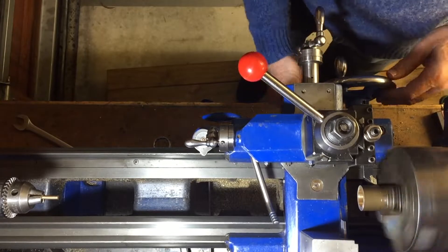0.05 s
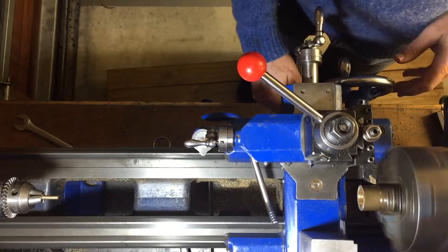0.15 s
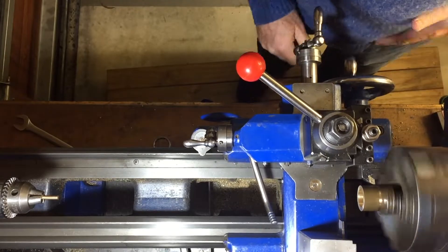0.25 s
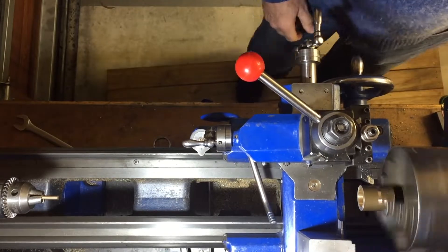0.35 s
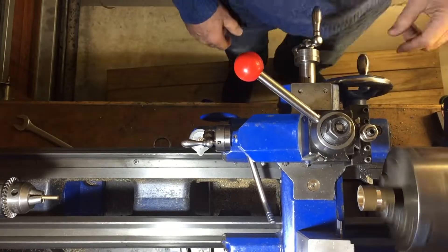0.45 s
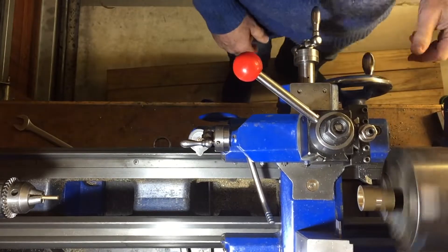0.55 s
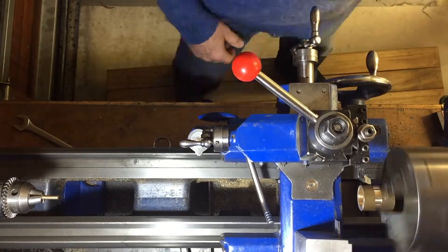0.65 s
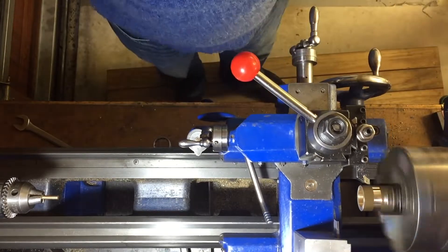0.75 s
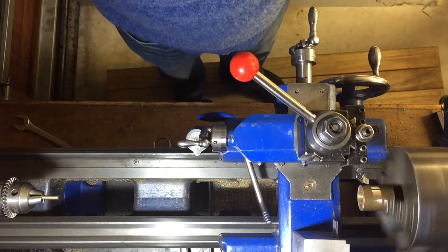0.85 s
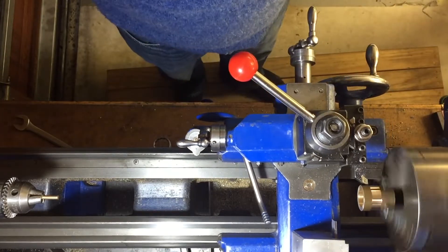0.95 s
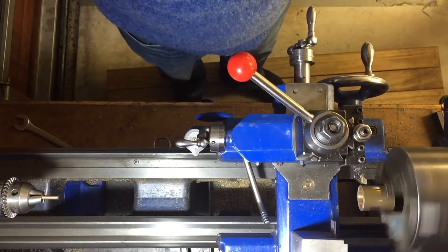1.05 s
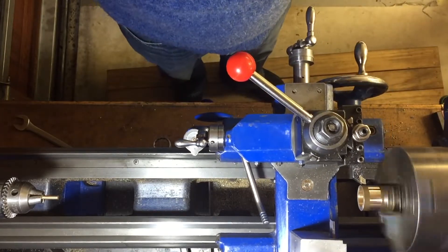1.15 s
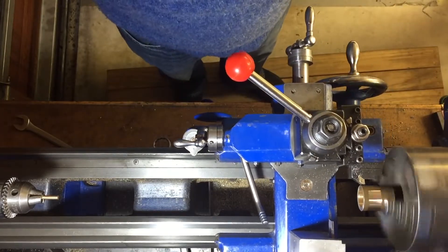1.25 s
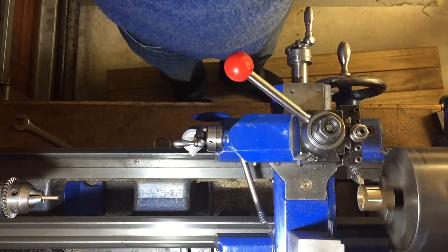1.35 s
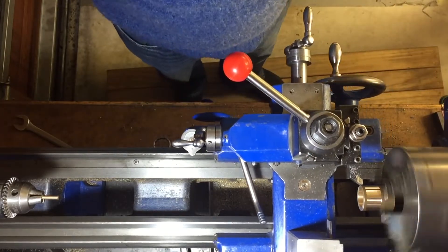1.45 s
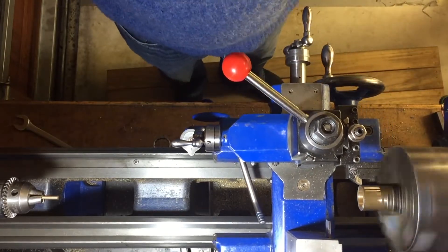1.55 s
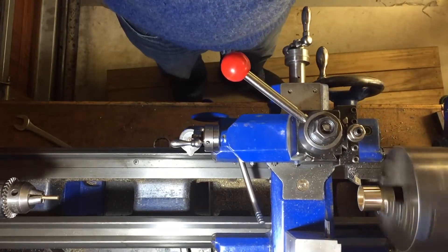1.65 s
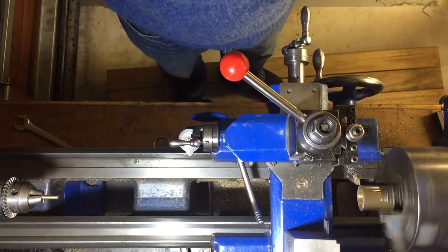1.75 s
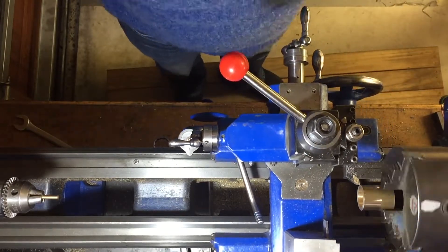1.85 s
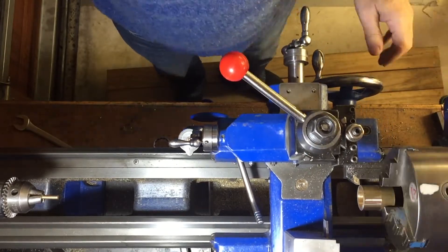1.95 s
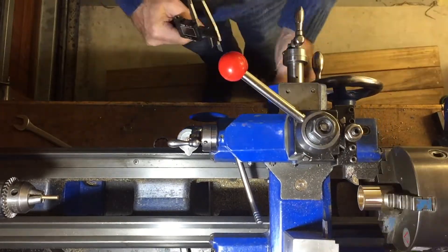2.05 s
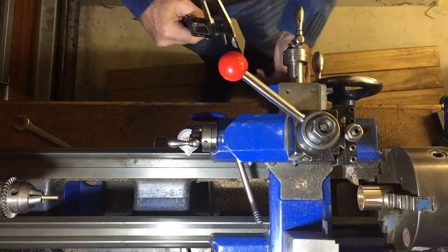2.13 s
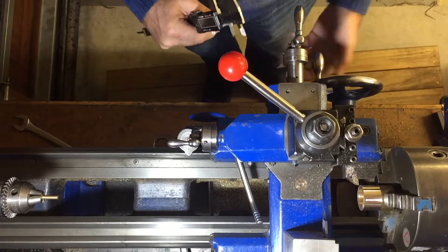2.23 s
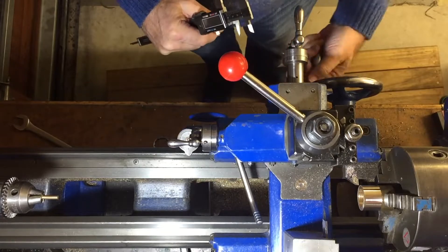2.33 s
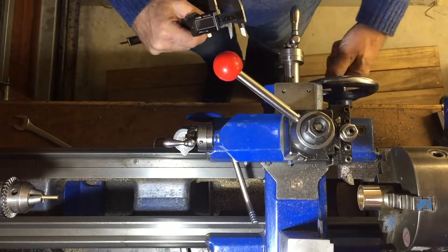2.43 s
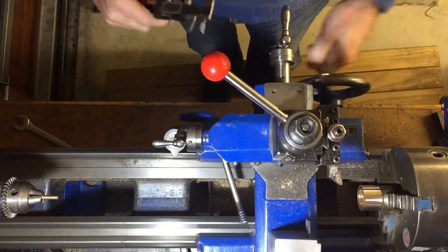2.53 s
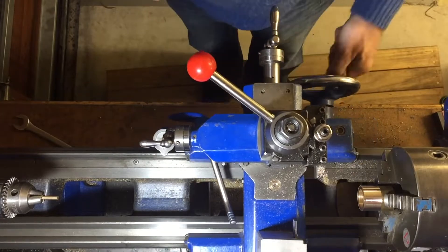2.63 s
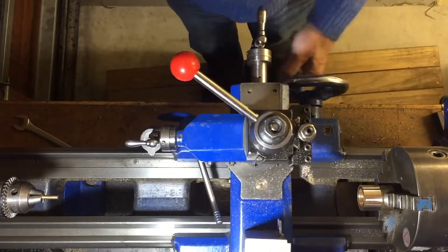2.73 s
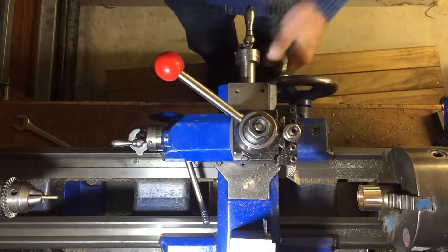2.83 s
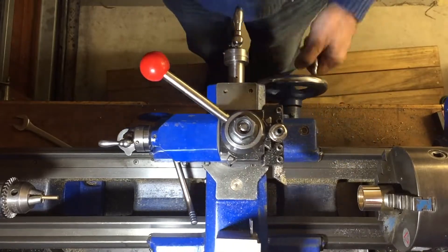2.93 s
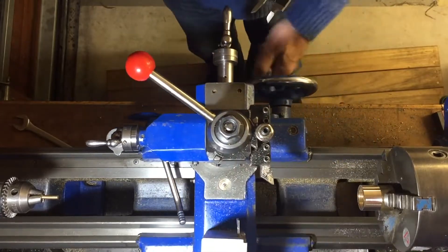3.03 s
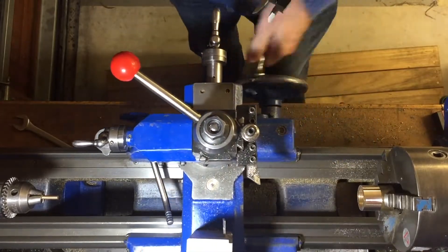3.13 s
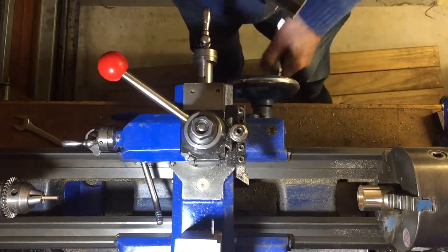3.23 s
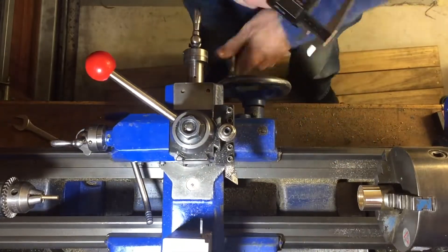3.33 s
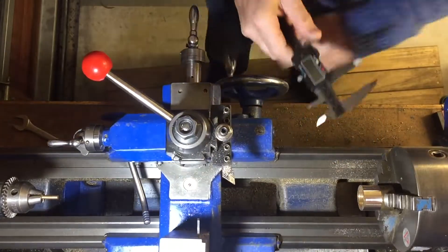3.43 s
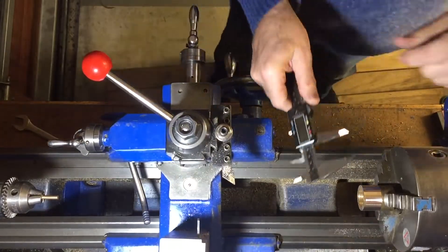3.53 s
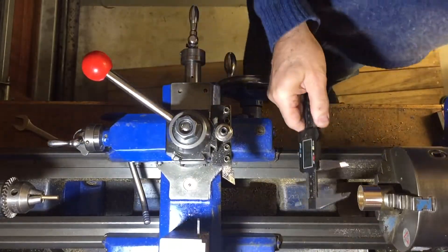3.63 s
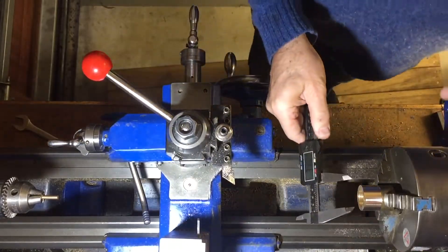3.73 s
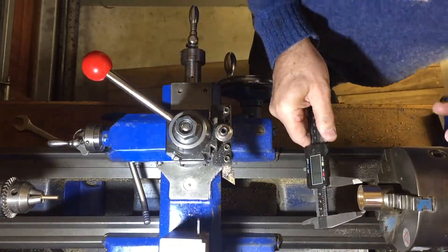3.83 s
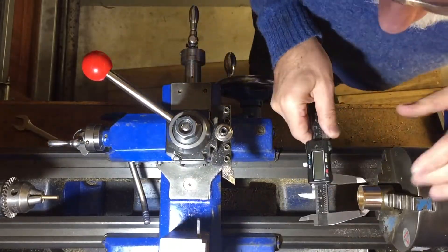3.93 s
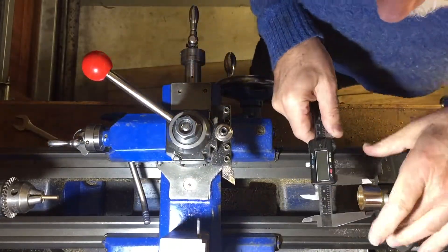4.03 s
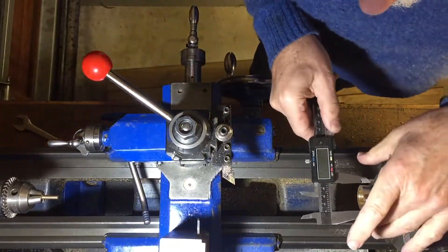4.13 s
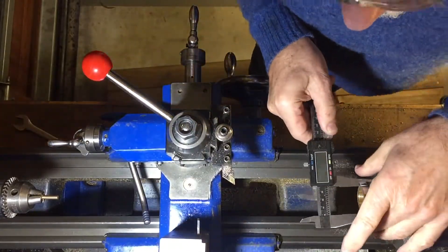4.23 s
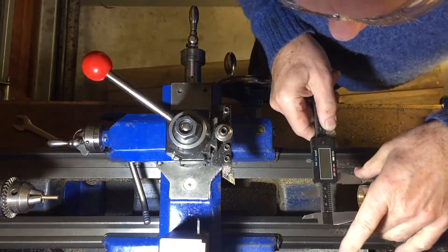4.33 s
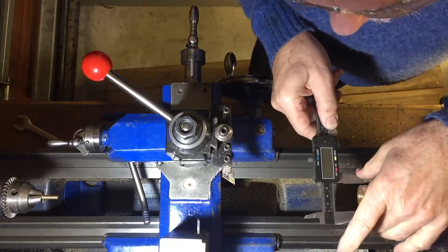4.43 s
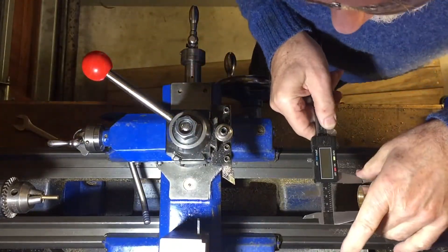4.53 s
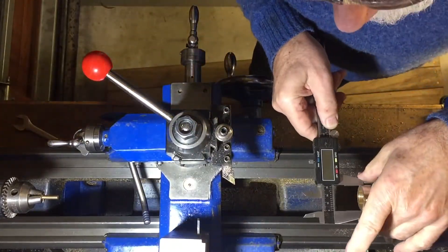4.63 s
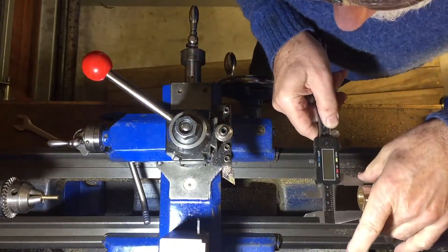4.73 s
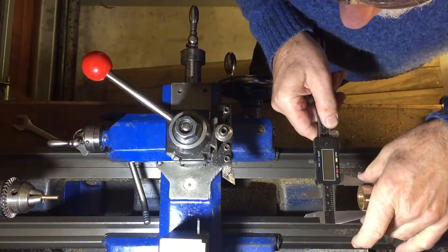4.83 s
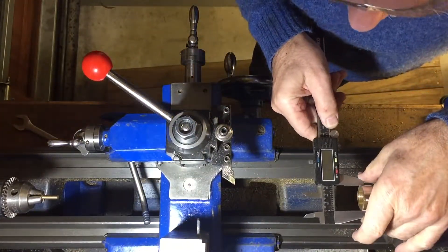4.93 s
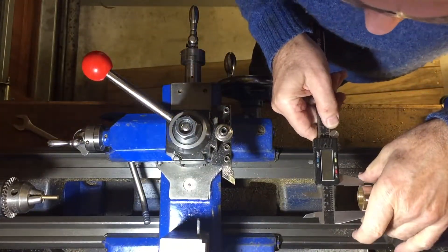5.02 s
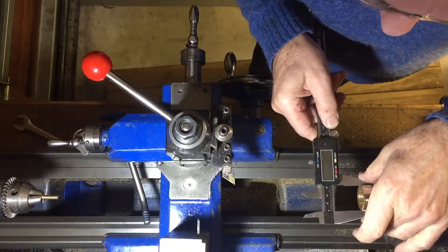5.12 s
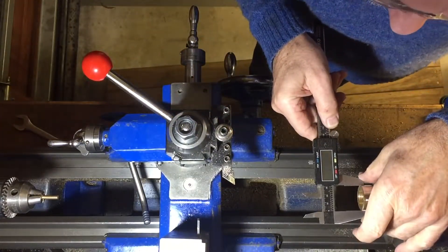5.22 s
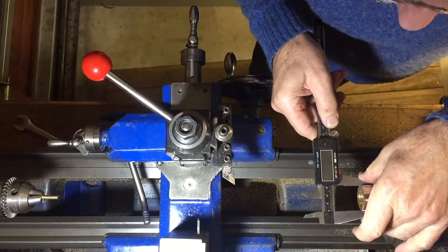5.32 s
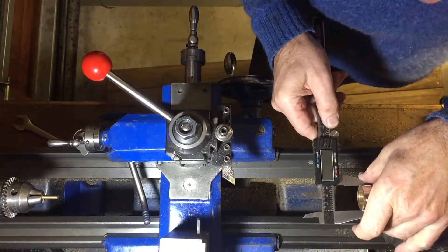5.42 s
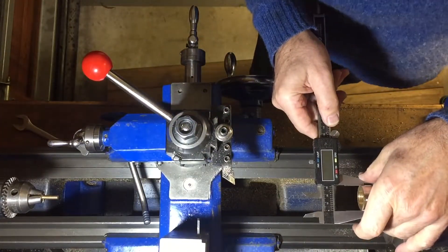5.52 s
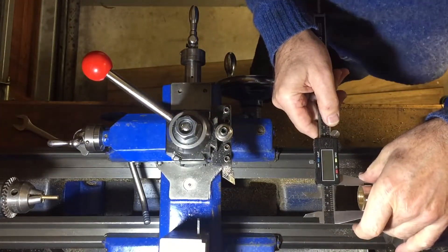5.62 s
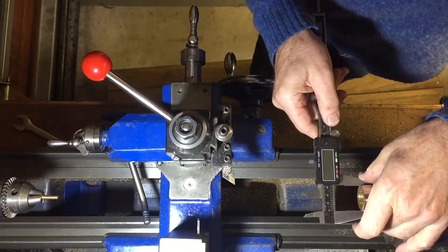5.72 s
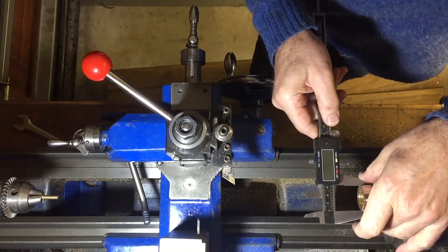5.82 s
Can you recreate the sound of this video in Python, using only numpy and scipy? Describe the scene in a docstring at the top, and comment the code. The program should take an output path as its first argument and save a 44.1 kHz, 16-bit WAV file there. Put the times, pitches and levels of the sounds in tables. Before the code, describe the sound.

Even motor whine and gear buzz cut to near silence, followed by cranked rack rumble, handwheel clanks, a caliper swish and tiny metallic taps.

```python
"""In a quiet workshop, a small metal lathe runs close by: even whine, fast gear chatter, then silence.
The carriage is cranked back along the bed: the rack rumbles, the carriage knocks, the loose handwheel clanks.
A sleeve brushes past during the cranking; then a caliper slides open with a swish, the chuck is nudged
by hand and the jaws click on the work.
Steady parts are sums of sines and shaped noise; struck parts are short noise bursts through resonant filters."""
import sys
import numpy as np
from scipy import signal
from scipy.fft import rfft, irfft
from scipy.io import wavfile
from scipy.ndimage import uniform_filter1d

SR = 44100
rng = np.random.default_rng(int(sys.argv[2]) if len(sys.argv) > 2 else 0)


def bounce(signal):
    """Save signal as a 16-bit WAV file at the path given by the first command-line argument."""
    frames = np.transpose(np.atleast_2d(signal))
    limited = np.clip(frames, -1, 1)
    pcm = np.round(limited * 32767).astype(np.int16)
    wavfile.write(sys.argv[1], SR, pcm)


N = 258937
T = np.arange(N) / SR  # s

# Throughout: a colour is [f/Hz, relative level/dB per Hz]; modes are resonances [f/Hz, width/Hz, lift/dB].

# steady drive tones [f/Hz, level/dB rms]
WHINE_TONES = [(354, -77), (908, -65.5), (926, -59.5), (942, -65.5), (1416, -74), (1600, -59.5),
               (2058, -63), (2400, -70.5), (3003, -74), (3200, -52.5), (4134, -86), (4800, -72.5),
               (5600, -103), (6498, -81.5), (7214, -70), (8872, -82), (9410, -78), (10266, -92)]
# rates at which two gears chop the motor's note [f/Hz]
GEAR_BEATS_HZ = [85.9, 90.0]
# side tones on the motor's note, one row per gear beat, before flutter
# [one beat below: level/dB, one beat above: level/dB, two beats above: level/dB]
CHATTER_SIDES = [(-63, -51.5, -76), (-57, -53.5, -58.5)]
# gear noise colour [f/Hz, level/dB]
GEAR_COLOUR = [(35, -88), (60, -88), (118, -45), (351, -19.5), (409, -21), (561, -12.5), (733, -9.5),
               (791, -10), (910, -10), (1140, -20), (1250, -54.5), (1620, -17), (2750, -120)]
# bearing noise colour [f/Hz, level/dB]
BEARING_COLOUR = [(650, -39.5), (1100, -24.5), (1400, -7.5), (1650, -15.5), (1880, -9), (2120, -9.5),
                  (2500, -18), (3000, -11), (3400, -13), (3780, -12.5), (4420, -14), (6380, -16),
                  (8610, -18), (10800, -18.5), (12300, -15.5), (15700, -18)]
# lathe housing modes [f/Hz, width/Hz, lift/dB]
HOUSING_MODES = [(1404, 300, 6.5), (1705, 80, 8.5), (2027, 84, 6), (2830, 77, 5.5), (3187, 120, 7),
                 (3740, 250, 8.5), (4510, 330, -6.5), (6500, 520, 7), (7200, 120, -5.5), (8550, 1800, 8)]
MOTOR_HZ, MOTOR_DB = 800, -50.5
GEARS_DB, BEARINGS_DB = -51.5, -51.5  # rms while running
STOP_S = 1.802


def lathe():
    """Motor sines with gear sidebands, plus gear and bearing noise; after the stop the tones vanish first."""
    motor = 2 * np.pi * MOTOR_HZ * T
    beats = [2 * np.pi * (hz * T + rng.random()) + .2 * drift(35) for hz in GEAR_BEATS_HZ]
    # nearly equal beat rates: the chatter swells about four times a second
    sides = np.zeros(N)
    for beat, (below_db, above_db, second_db) in zip(beats, CHATTER_SIDES):
        sides += amp(below_db) * np.cos(motor - beat)
        sides += amp(above_db) * np.cos(motor + beat)
        sides += amp(second_db) * np.cos(motor + 2 * beat)
    flutter = amp(1.5 * drift(55))
    chatter = np.sqrt(2) * (amp(MOTOR_DB) * np.cos(motor) + sides * flutter)
    whine = sum(tone(hz, db, waver_rad=.15) for hz, db in WHINE_TONES)

    # mesh noise swells with each beat
    mesh_db = 2 * sum(np.cos(beat) for beat in beats) + drift(40)
    gears = amp(GEARS_DB) * unit(hiss(shape(GEAR_COLOUR)) * amp(mesh_db))
    bearing_hiss = hiss(shape(BEARING_COLOUR, HOUSING_MODES)) * amp(0.84 * drift(60))
    bearings = amp(BEARINGS_DB) * glancing(bearing_hiss, gain=0.13)

    after_s = np.maximum(T - STOP_S, 0)
    tones = (chatter + whine) * amp(-2500 * after_s)
    return tones + gears * amp(-155 * after_s) + bearings * amp(-(after_s / 0.02) ** 2)


# handwheel pushes, a nudge then the crank; levels are gains at the fastest moment
# [t/s, length/s, rumble level/dB, grind level/dB]
HANDWHEEL_PUSHES = [(2.399, 0.069, -33, -71), (2.533, 0.9, -29.5, -48.5)]
# rumble colour of rack and pinion [f/Hz, level/dB]
RACK_COLOUR = [(25, -65), (45, -36), (64, -28), (83, -7), (135, 1.5), (175, 0.5), (232, 0), (300, -19),
               (345, -15), (440, -29.5), (520, -29.5), (700, -27.5), (1000, -59)]
# apron modes [f/Hz, width/Hz, lift/dB]
APRON_MODES = [(92, 18, 4), (147.7, 15, 5.5), (215.5, 23, 2.5), (354, 17, 4)]
# sliding-steel colour of the ways [f/Hz, level/dB]
WAYS_COLOUR = [(260, -50), (450, 5.5), (529, -1.5), (612, -19), (763, 1), (951, -11.5), (1120, -20),
               (1280, -1.5), (1790, -10.5), (2330, -5), (2660, -7), (2900, -7), (15000, -33.5)]
RUMBLE_SAG_DB, GRIND_SAG_DB = 7.5, 15  # fall one whole length away from the fastest moment
SURGE_HZ, SURGE_DB, SURGE_CREST_S = 6.7, 2.5, 3.018
JOLT_DB, JOLT_PEAK_S = 2, 0.028  # rumble lift after a clank, delay of its peak


def carriage(teeth_hz=46, uneven=.25, rub=1.0, rattle_share=0.59):
    """Gear teeth bump and shake the apron while the gritty ways grind; both follow the push of the hand."""
    turns = np.cumsum(teeth_hz * (1 + uneven * drift(15))) / SR
    teeth = np.diff(np.floor(turns), prepend=0) * amp(2 * rng.standard_normal(N))
    shaking_force = unit(teeth) + rub * rng.standard_normal(N)
    shake = unit(colour(shaking_force, shape(RACK_COLOUR, APRON_MODES)))
    # the hand keeps an even push over a few teeth
    power = uniform_filter1d(uniform_filter1d(shake ** 2, size=2000), size=1000)
    shake /= np.sqrt(abs(power) + 1e-6)

    ways_db = shape(WAYS_COLOUR, CARRIAGE_MODES)
    friction = rng.standard_normal(N) * amp(2.1 * np.cos(2 * np.pi * turns))
    grind = unit(colour(friction, ways_db))
    # loose parts: small dull rattles, 5 ms decay constant
    loose = signal.lfilter([1], [1, -np.exp(-1 / (.005 * SR))], abs(grit(90, 1.8)))
    dull_db = ways_db - 2.9 * np.log2(bins() / 1300) ** 2
    rattle = unit(colour(loose * rng.standard_normal(N), dull_db))

    rumbling, grinding = np.zeros(N), np.zeros(N)
    for s, length_s, rumble_db, grind_db in HANDWHEEL_PUSHES:
        rumbling += amp(rumble_db) * push(s, length_s, RUMBLE_SAG_DB)
        grinding += amp(grind_db) * push(s, length_s, GRIND_SAG_DB)
    # the pinion rolls along the rack in even surges
    surge = np.cos(2 * np.pi * SURGE_HZ * (T - SURGE_CREST_S))
    # each handwheel clank jolts the apron
    ages = [np.maximum(T - row[0], 0) / JOLT_PEAK_S for row in WHEEL_CLANKS]
    jolts = np.max([age * np.exp(1 - age) for age in ages], axis=0)
    rumble = shake * rumbling * amp(SURGE_DB * surge + JOLT_DB * jolts)
    return rumble + unit(grind + rattle_share * rattle) * grinding


GRIP_S, FASTEST_AT, COAST_DB_PER_S = .023, 0.45, 188  # FASTEST_AT: share of the length


def push(start_s, length_s, sag_db):
    """Gain of one handwheel push: takes hold, arches through its fastest moment, coasts out."""
    grip = np.clip((T - start_s) / GRIP_S, 0, 1)
    done = np.clip((T - start_s) / length_s, 0, 1)
    coasting_s = np.maximum(T - start_s - length_s, 0)
    return grip * amp(-sag_db * (done - FASTEST_AT) ** 2 - COAST_DB_PER_S * coasting_s)


# All blow tables: level is rms over the first 10 ms; focus narrows the colour around the centre.

# carriage knocks [t/s, level/dB, centre f/Hz, focus/(dB/octave^2), t60/s]
CARRIAGE_KNOCKS = [(2.4148, -27.5, 2500, 0.2, 0.044), (2.419, -23.5, 603, 1.2, 0.085),
                   (2.5497, -21, 3430, 2, 0.065), (2.636, -45, 3800, 18, .06), (2.686, -41, 1054, 5, 0.13),
                   (3.4022, -32, 1400, 4.5, 0.078)]
# carriage colour [f/Hz, level/dB]
CARRIAGE_COLOUR = [(59, -34), (100, -16), (205, 7.5), (614, -20.5), (774, -12), (1110, -26), (1290, -11),
                   (1690, -17), (2580, -13), (3850, -18.5), (6390, -28.5), (8230, -38.5), (10800, -34.5),
                   (15500, -46)]
# carriage modes [f/Hz, width/Hz, lift/dB]
CARRIAGE_MODES = [(526, 59, 13), (754, 89, 9.5), (955, 82, 13.5), (1234, 110, 9), (1540, 90, 3.5),
                  (2234, 130, 8.5), (2880, 180, 4), (3430, 250, 3), (6740, 1300, 7), (9400, 1200, -12),
                  (10500, 360, 10)]


def carriage_knocks():
    """Hard blows ring the carriage, with a strong room tail."""
    return blows(CARRIAGE_KNOCKS, CARRIAGE_COLOUR, CARRIAGE_MODES,
                 crack=1.5, tail_db=-8.5, tail_t60_s=0.19, contact_s=0.00038)


# handwheel clanks [t/s, level/dB, centre f/Hz, focus/(dB/octave^2), t60/s]
WHEEL_CLANKS = [(2.8261, -27.5, 2660, 1, 0.15), (2.9672, -25, 2815, 0.87, 0.093),
                (2.981, -31.5, 1600, 0.26, 0.16), (4.028, -50, 4000, 1, 0.14),
                (4.0392, -25.5, 2230, 0.19, 0.14)]
# handwheel colour [f/Hz, level/dB]
WHEEL_COLOUR = [(290, -36), (500, -12.5), (737, -8), (950, -13), (1250, -4.5), (1700, -8.5), (2100, -2.5),
                (3430, -13), (4440, -5.5), (5510, -15), (12500, -27), (15500, -32)]
# handwheel modes [f/Hz, width/Hz, lift/dB]
WHEEL_MODES = [(1260, 60, 7), (1560, 70, 3), (1800, 60, 5), (1960, 50, 7), (2090, 60, 8), (2430, 60, 6),
               (2950, 80, 4), (3700, 90, 4), (4345, 70, 10), (4700, 110, 2), (6950, 100, 8), (8500, 300, 4)]


def handwheel_clanks():
    """The loose handwheel rattles with little initial crack."""
    return blows(WHEEL_CLANKS, WHEEL_COLOUR, WHEEL_MODES,
                 crack=0.12, tail_db=-32, tail_t60_s=0.13, contact_s=0.00057)


# caliper beam colour [f/Hz, level/dB]
BEAM_COLOUR = [(350, -63), (600, -41), (706, 15.5), (866, -10), (1080, 2), (1860, -2.5), (2470, -4),
               (3980, -2.5), (4750, -3.5), (7140, -5.5), (15500, -16)]
# caliper beam modes [f/Hz, width/Hz, lift/dB]
BEAM_MODES = [(1600, 100, 10), (2250, 120, 7), (3110, 92, 6), (3950, 250, 2.5), (4640, 110, 6)]
SLIDE_S, SLIDE_LENGTH_S, SLIDE_GAIN_DB = 3.59, .15, -36
SLIDE_CURVE, BRAKE_DB_PER_S = 1.68, 472  # higher curve: gathers speed later
SHUT_HZ, OPEN_HZ = 2300, 710  # low edge of the swish, jaws shut and open


def caliper_slide(peak_ratio=3.6, peak_db=4):
    """The jaw speeds up along its beam and is braked; the swish and its brightest band fall as it opens."""
    rubbing = grit(2700, 2.1) + 0.62 * rng.standard_normal(N)
    rub = glancing(colour(rubbing, shape(BEAM_COLOUR, BEAM_MODES)))
    hz, frame_s, spectrum = signal.stft(rub, SR, nperseg=512)

    opened = np.clip((T - SLIDE_S) / SLIDE_LENGTH_S, 0, 1)
    low_hz = SHUT_HZ + (OPEN_HZ - SHUT_HZ) * opened ** 2
    above = (hz[:, None] + 1) / np.interp(frame_s, T, low_hz)
    bright_band = amp(peak_db / (1 + (4 * np.log2(above / peak_ratio)) ** 2))
    low_cut = 1 / np.sqrt(1 + above ** -6)
    swish = signal.istft(spectrum * bright_band * low_cut, SR, nperseg=512)[1][:N]

    braking_s = np.maximum(T - SLIDE_S - SLIDE_LENGTH_S, 0)
    speed = np.sin(np.pi / 2 * opened) ** SLIDE_CURVE * amp(-BRAKE_DB_PER_S * braking_s)
    catch_db = 1.1 * drift(170)
    return swish * speed * amp(SLIDE_GAIN_DB + catch_db)


# light steel clicks [t/s, level/dB, centre f/Hz, focus/(dB/octave^2), t60/s]
STEEL_CLICKS = [(0.722, -51, 5500, 1.6, 0.093), (2.516, -59.5, 8800, 37, 0.33),
                (3.5625, -56.5, 8500, 0.47, 0.11), (3.8822, -45, 5600, 3.6, 0.033),
                (4.1865, -52, 3420, 5.1, 0.062), (4.301, -57.5, 3000, 0.58, 0.38),
                (4.3195, -39.5, 8100, 2.6, 0.02), (4.3845, -53, 8200, 24, .025),
                (4.3985, -42, 8250, 18, 0.024), (5.541, -63, 6000, 0.46, 0.086),
                (5.6995, -60, 6000, 0.55, 0.091)]
# caliper colour [f/Hz, level/dB]
CALIPER_COLOUR = [(400, 16), (1500, 5.5), (2500, -6.5), (4000, -4), (7000, 3), (9000, -7.5), (10500, -7.5),
                  (15500, -15)]
# caliper modes [f/Hz, width/Hz, lift/dB]
CALIPER_MODES = [(2330, 130, 14.5), (3620, 74, 11), (4020, 430, 16.5), (6000, 740, -1.5), (7120, 240, 9.5),
                 (8900, 620, 9.5), (15300, 500, 6)]


def steel_clicks():
    """Sharp-cracked, hard contacts ring light steel."""
    return blows(STEEL_CLICKS, CALIPER_COLOUR, CALIPER_MODES,
                 crack=1.8, tail_db=-20.0, tail_t60_s=0.16, contact_s=0.000058)


# jaws tapping the work [t/s, level/dB, centre f/Hz, focus/(dB/octave^2), t60/s]
JAW_TAPS = [(4.438, -53, 3000, 1.5, 0.041), (4.6908, -42.5, 3500, 3, 0.059)]
# work colour [f/Hz, level/dB]
WORK_COLOUR = [(800, -17), (1500, -12), (2500, -7.5), (3500, -5.5), (4400, -13), (5100, -1), (5800, -17),
               (8800, -9), (10000, -26), (15500, -20)]
# work modes [f/Hz, width/Hz, lift/dB]
WORK_MODES = [(2450, 100, 6), (3050, 90, 12), (3490, 90, 14), (3920, 100, 10), (5080, 170, 8),
              (6600, 250, 6), (7700, 250, 6), (8720, 400, 8)]


def jaw_taps():
    """The jaws tap the work, which rings at its own modes."""
    return blows(JAW_TAPS, WORK_COLOUR, WORK_MODES,
                 crack=0.56, tail_db=-12, tail_t60_s=0.13, contact_s=0.00063)


# chuck thuds [t/s, level/dB, centre f/Hz, focus/(dB/octave^2), t60/s]
CHUCK_THUDS = [(3.953, -60, 525, 4.6, .12), (3.991, -54.5, 434, 10, .12), (4.2375, -45, 800, 0.92, 0.14),
               (4.4395, -41.5, 520, 0.99, 0.14), (4.692, -47, 600, 0.62, 0.096)]
# chuck colour [f/Hz, level/dB]
CHUCK_COLOUR = [(200, -34), (300, -18), (380, -3), (540, -2), (720, -15.5), (950, -7.5), (1150, -21),
                (1500, -39), (4000, -30)]
# chuck modes [f/Hz, width/Hz, lift/dB]
CHUCK_MODES = [(383, 38, 5), (492, 38, 6.5), (872, 35, 11), (1000, 21, 3.6)]


def chuck_thuds():
    """The hand nudges the chuck: low modes with a long, faint tail."""
    return blows(CHUCK_THUDS, CHUCK_COLOUR, CHUCK_MODES,
                 crack=0.89, tail_db=-25, tail_t60_s=0.51, contact_s=0.00051)


# sleeve strokes, peak level before flutter [t/s, rise/s, level/dB]
SLEEVE_BRUSHES = [(3.135, 0.053, -47), (3.385, .038, -56)]
# cloth colour [f/Hz, level/dB]
CLOTH_COLOUR = [(300, -12), (1000, 8.5), (3000, 0), (7000, -4), (15500, -13)]
BRUSH_SHARPNESS = 6


def sleeve():
    """Cloth brushes past as the wheel turns: short hiss strokes that swell quickly, fade more slowly."""
    strokes = np.zeros(N)
    for s, rise_s, db in SLEEVE_BRUSHES:
        age = np.maximum(T - s, 0) / rise_s
        strokes += amp(db) * (age * np.exp(1 - age)) ** BRUSH_SHARPNESS
    return hiss(shape(CLOTH_COLOUR)) * strokes * amp(drift(80))


# workshop air colour [f/Hz, level/dB]
SHOP_COLOUR = [(18, -91), (30, -54), (100, -8), (193, -6.5), (271, -17), (334, -16), (371, -15.5),
               (401, -21.5), (434, -18.5), (660, -20.5), (793, -22), (880, -24), (1790, -25.5),
               (4470, -27.5), (15700, -35)]
# workshop hum [f/Hz, level/dB rms]
HUM_TONES = [(200, -69.5), (240, -77), (400, -83.5), (600, -88), (4290, -94), (4390, -85)]
# soft bumps [t/s, level/dB, centre f/Hz, focus/(dB/octave^2), t60/s]
SOFT_BUMPS = [(2.115, -46.5, 280, 4, 0.076), (2.151, -57, 200, 2, .06), (2.208, -46.5, 324, 4.5, 0.062),
              (2.224, -46, 280.8, 0, 0.039)]
SHOP_DB, SHOP_START_S, SHOP_FADE_S = -62.5, 2.031, .012


def workshop():
    """Low rumbling air noise and faint hum sines, with a few soft bumps."""
    air = amp(SHOP_DB) * hiss(shape(SHOP_COLOUR))
    hum = sum(tone(hz, db, waver_rad=0.17) for hz, db in HUM_TONES)
    heard = np.clip((T - SHOP_START_S) / SHOP_FADE_S, 0, 1)
    bumps = blows(SOFT_BUMPS, RACK_COLOUR, APRON_MODES, crack=1., tail_db=-15, tail_t60_s=.2)
    return (air + hum) * heard + bumps


def blows(rows, body, modes, crack=1., tail_db=-20, tail_t60_s=0.21, contact_s=0.00018, size=440):
    """A short crack and a quickly dying rattle ring one part; the workshop adds a brief tail."""
    out, t = np.zeros(N), np.arange(SR // 2) / SR
    contact = 1 - np.exp(-t / contact_s)
    for s, db, centre_hz, focus, t60_s in rows:
        rattle, room = rng.standard_normal((2, len(t)))
        strike = amp(-60 * t / max(t60_s, .004)) + crack * np.exp(-t / (4 * contact_s))
        tail = amp(tail_db - 60 * t / tail_t60_s)
        force = contact * (rattle * strike + room * tail)
        focus_db = abs(focus) * np.log2(bins() / centre_hz) ** 2
        ring = colour(force, shape(body, modes) - focus_db)
        add(out, s, amp(db) * ring / np.sqrt(np.mean(ring[:size] ** 2)))
    return out


def glancing(x, gain=0.28, within_s=.009, count=7):
    """Early reflections off the bed and nearby steel comb a hiss into streaks; rms 1."""
    out = x.copy()
    for delay, sign in zip(rng.uniform(.1, 1, count) * within_s, rng.choice([-1, 1], count)):
        add(out, delay, sign * gain * x)
    return unit(out)


def grit(per_s, spread_db):
    """Sparse tiny catches of very different sizes, rms 1."""
    size = amp(spread_db * np.minimum(rng.exponential(1, N), 4))
    return unit(size * rng.choice([-1, 1], N) * (rng.random(N) < per_s / SR))


def tone(hz, db, waver_rad=0.):
    """Sine at an rms level, its phase wavering by waver_rad rms."""
    phase = 2 * np.pi * (hz * T + rng.random()) + waver_rad * drift(12)
    return np.sqrt(2) * amp(db) * np.sin(phase)


def hiss(db):
    """Coloured noise, rms 1."""
    return unit(colour(rng.standard_normal(N), db))


def drift(rate_hz):
    """Random wander: noise low-passed near rate_hz, rms 1."""
    hz = np.fft.rfftfreq(N, 1 / SR)
    return unit(irfft(rfft(rng.standard_normal(N)) / (1 + (hz / rate_hz) ** 4), N))


def bins(size=8192):
    """Frequency grid for colours, Hz; offset by 1 to keep logs finite."""
    return np.fft.rfftfreq(size, 1 / SR) + 1


def shape(points, modes=()):
    """A body's response in dB: broad colour lifted at its modes."""
    f, db = np.transpose(points)
    hz = bins()
    broad_db = np.interp(np.log(hz), np.log(f), db)
    return broad_db + sum(lift / (1 + (2 * (hz - at) / width) ** 2) for at, width, lift in modes)


def colour(x, db):
    """Minimum-phase filter with this response: causal, so modes ring after the blow."""
    cepstrum = irfft(np.log(amp(np.maximum(db - db.max(), -90))))
    half = len(cepstrum) // 2
    # fold the cepstrum onto positive time
    cepstrum[1:half] *= 2
    cepstrum[half + 1:] = 0
    impulse = irfft(np.exp(rfft(cepstrum)))[:half]
    return signal.oaconvolve(x, impulse)[:len(x)]


def amp(db):
    """Decibels to gain."""
    return 10 ** (np.asarray(db) / 20)


def unit(x):
    """Scale to rms 1."""
    return x / np.sqrt(np.mean(x ** 2) + 1e-20)


def add(mix, s, sound):
    """Add a sound into the mix at time s, cut at the end."""
    part = mix[round(s * SR):][:len(sound)]
    part += sound[:len(part)]


def scene():
    """Sum of the struck parts, the moving parts and the workshop."""
    struck = carriage_knocks() + handwheel_clanks() + chuck_thuds() + steel_clicks() + jaw_taps()
    moving = lathe() + carriage() + caliper_slide() + sleeve()
    return (struck + moving + workshop())[None]


EDGE_HZ = 15900


def record(dry):
    """Band limit: linear-phase low-pass at EDGE_HZ."""
    lowpass = signal.firwin(511, EDGE_HZ, window=("kaiser", 9), fs=SR)
    return signal.oaconvolve(dry, lowpass[None], "same")


dry = scene()
out = record(dry)
bounce(out)
```